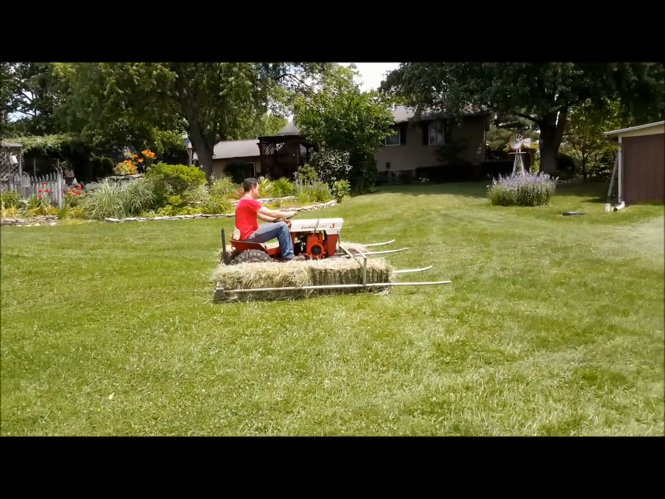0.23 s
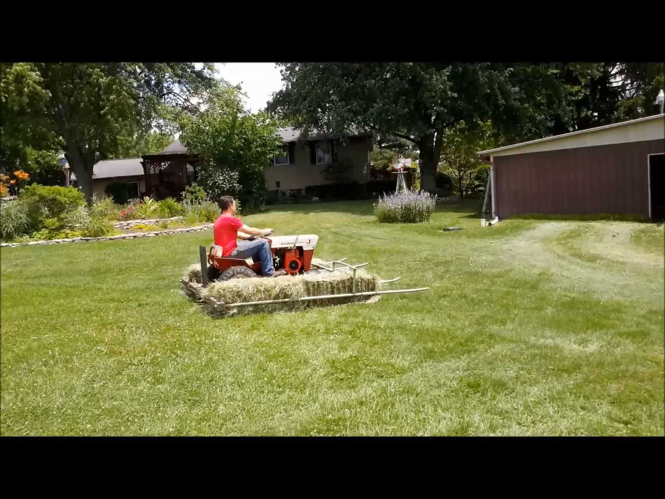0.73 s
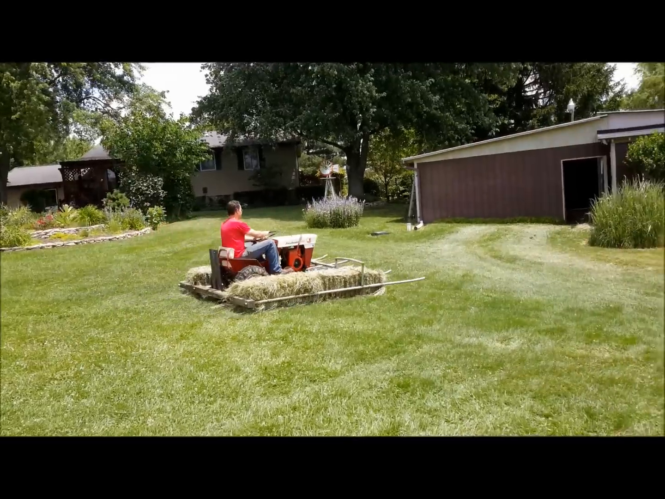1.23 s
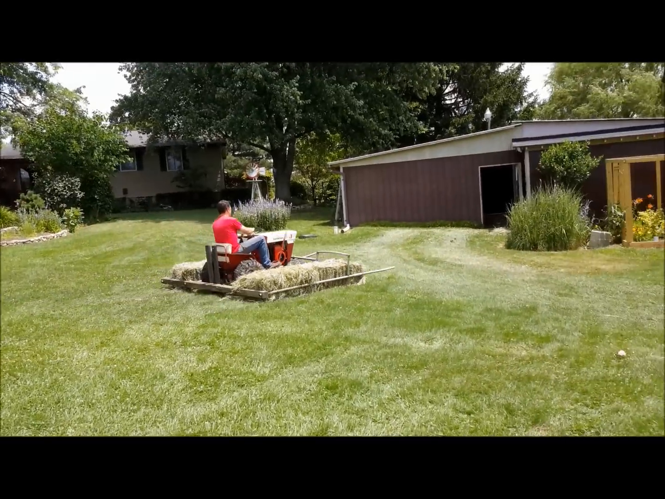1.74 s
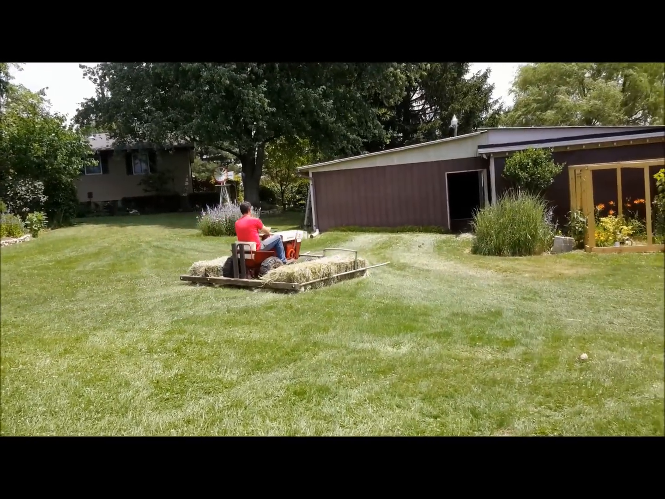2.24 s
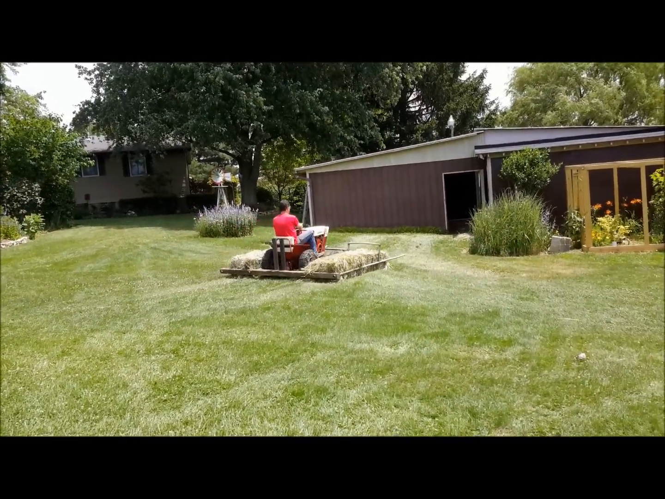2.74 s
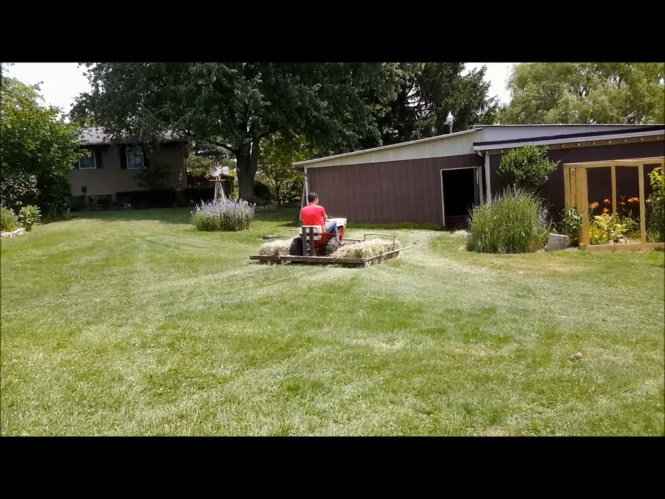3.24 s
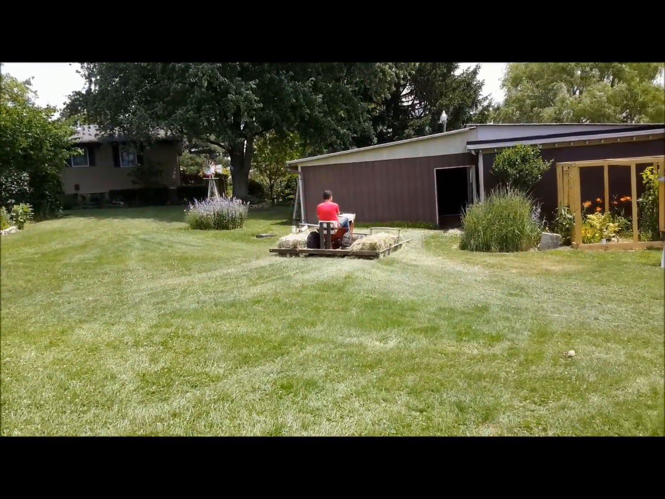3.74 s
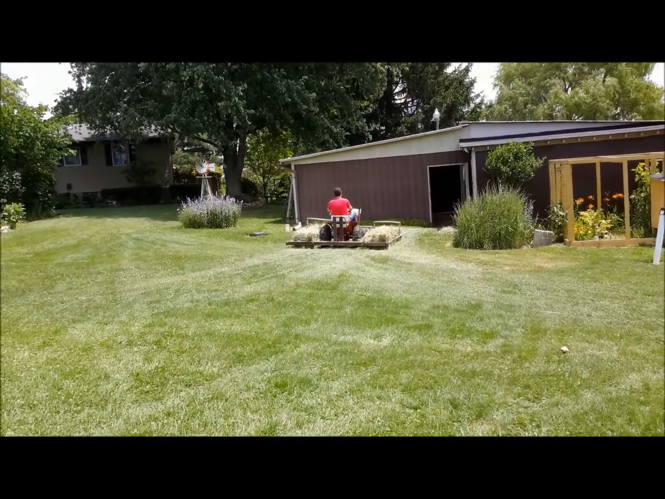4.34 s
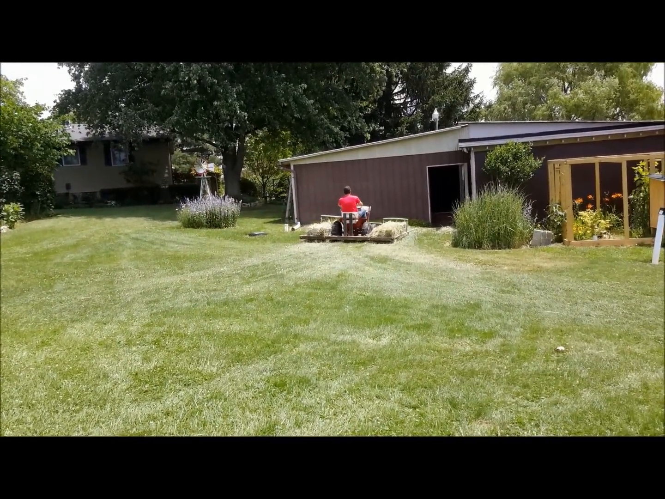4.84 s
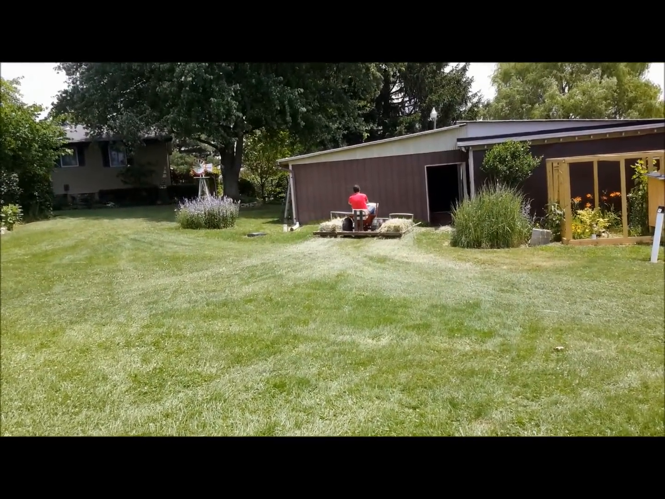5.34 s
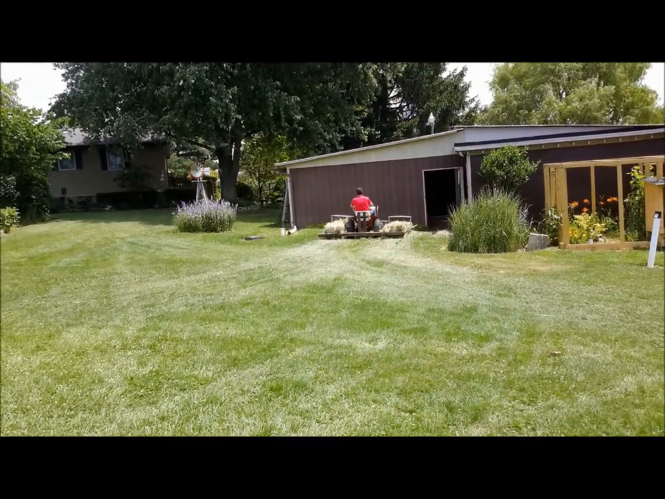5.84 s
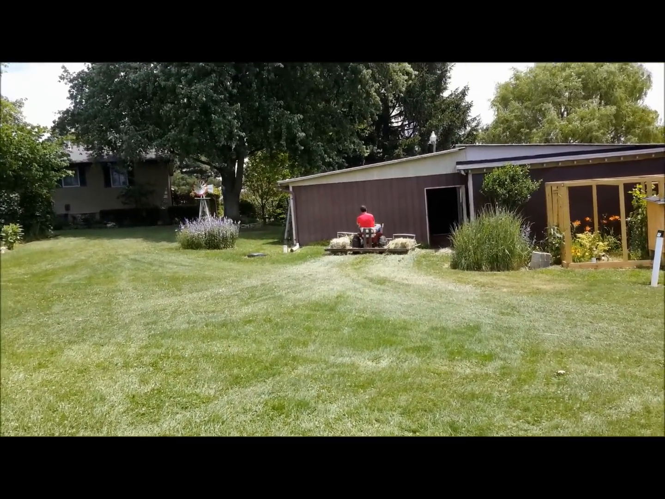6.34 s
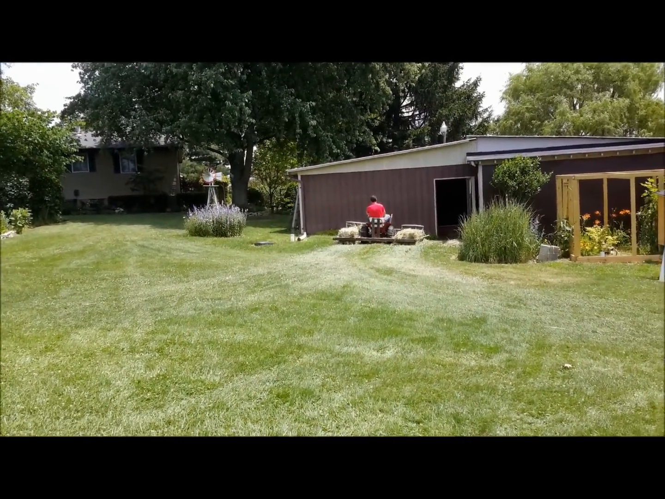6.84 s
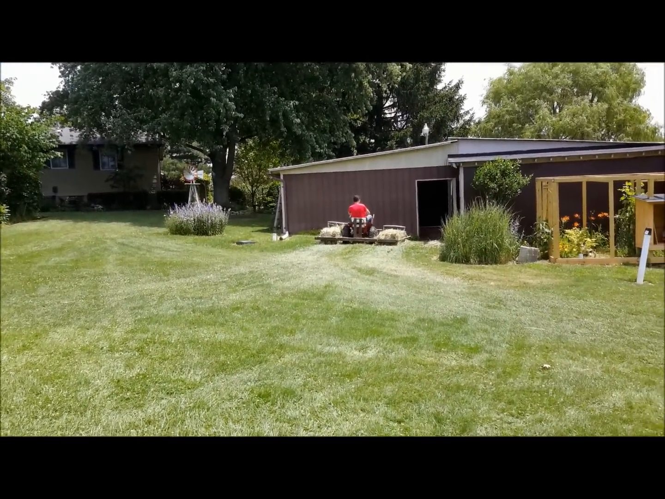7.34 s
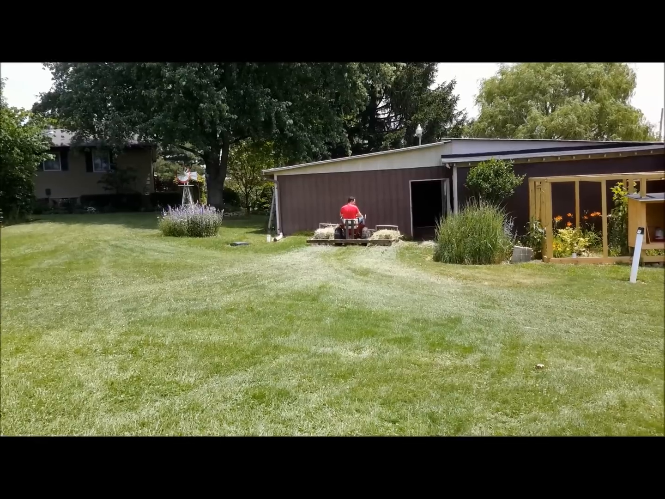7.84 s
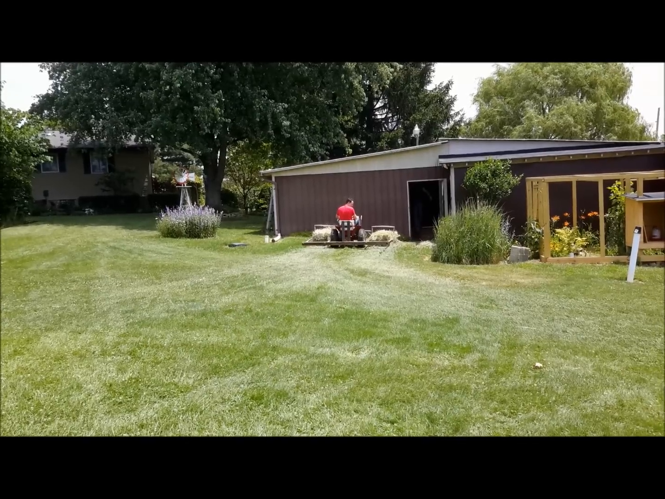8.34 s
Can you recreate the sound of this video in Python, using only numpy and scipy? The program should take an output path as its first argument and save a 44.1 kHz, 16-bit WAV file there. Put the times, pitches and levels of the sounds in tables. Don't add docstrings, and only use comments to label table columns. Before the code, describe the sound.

Outdoors on a lawn, a small single-cylinder tractor runs with quick, separate exhaust thumps and a loose tin clatter. It starts closest and rattly, then turns away, the clatter fading while the thumps stand out and echo off a shed. Near the end the engine slows, labours, then picks up slightly. Wind buffets the small microphone in low, blunt bumps, insects buzz very faintly, and a distant bird chirps late.

```python
import sys
import numpy as np
from scipy import signal
from scipy.fft import rfft, irfft, next_fast_len
from scipy.io import wavfile
from scipy.ndimage import uniform_filter1d, map_coordinates

SR = 44100
rng = np.random.default_rng(int(sys.argv[2]) if len(sys.argv) > 2 else 0)


def file_out(sig):
    cols = np.atleast_2d(sig).T
    lim = np.clip(cols, -1, 1)
    pcm = np.round(lim * 32767).astype(np.int16)
    wavfile.write(sys.argv[1], SR, pcm)


def magnitude_from_level(level_db):
    exponent = np.asarray(level_db, float) / 20
    return 10 ** exponent


N = 378813
t = np.arange(N) / SR


def unit(x):
    return x / np.sqrt(np.mean(x ** 2) + 1e-20)


def curves(rows):
    s, *columns = np.transpose(rows)
    return [np.interp(t, s, column) for column in columns]


def swells(rows):
    return sum(db * np.exp(-(2 * (t - s) / length) ** 2) for s, length, db in rows)


def wobble(knots_per_s):
    knots = rng.standard_normal(int(N * knots_per_s / SR) + 4)
    return map_coordinates(knots, [t * knots_per_s])


def filtered(x, response):
    size = next_fast_len(N + SR // 2)
    hz = np.fft.rfftfreq(size, 1 / SR)
    return irfft(rfft(x, size) * response(hz), size)[:N]


def coloured(x, spectrum):
    points_hz, db = np.transpose(spectrum)

    def response(hz):
        return magnitude_from_level(np.interp(np.log(hz + 1), np.log(points_hz), db, -120, -120))

    return unit(filtered(x, response))


def ringing(x, modes):
    def response(hz):
        total = 0
        for k, (centre_hz, width_hz, db) in enumerate(modes):
            damping = 1j * hz * width_hz
            total = total + (-1) ** k * magnitude_from_level(db) * damping / (centre_hz ** 2 - hz ** 2 + damping)
        return total

    return unit(filtered(x, response))


def cut(x, order, hz, kind):
    return signal.sosfilt(signal.butter(order, hz, kind, fs=SR, output="sos"), x)


def later(x, delay_ms):
    return np.interp(t - delay_ms / 1000, t, x, 0)


def smeared(x, t60, wet_db):
    tail = rng.standard_normal(SR // 4) * magnitude_from_level(-60 * t[:SR // 4] / t60)
    return x + magnitude_from_level(wet_db) * signal.fftconvolve(x, tail / np.linalg.norm(tail))[:N]


# start_s, firing_rate_hz
SPEED = [(0.0, 23.506), (0.5, 22.879), (1.8, 22.253), (3.2, 22.133), (3.5, 22.438), (5.0, 22.375),
         (5.5, 22.903), (6.4, 20.254), (7.25, 18.873), (7.45, 17.453), (7.7, 16.559), (7.87, 17.314),
         (8.02, 19.315), (8.6, 19.749)]


def firings(lead_ms, scatter_db):
    first_cycle = -.345
    cycle = np.floor(first_cycle + np.cumsum(curves(SPEED)[0]) / SR)
    at = np.nonzero(np.diff(cycle))[0] - round(lead_ms * SR / 1000)
    strength = magnitude_from_level(scatter_db * rng.standard_normal(len(at)))
    spikes = np.zeros(N)
    spikes[at[at >= 0]] = strength[at >= 0]
    return spikes


def swell(spikes, rise_ms, fall_ms):
    ms = 1000 * t[:SR // 10]
    pulse = (1 - np.exp(-ms / rise_ms)) * np.exp(-ms / fall_ms)
    return np.abs(signal.fftconvolve(spikes, pulse)[:N])


# start_s, delay_ms
SHED = [(0, 95), (2.1, 55.7), (2.6, 57.6), (3.7, 45), (4, 39), (5, 24.2), (6.3, 14.7), (7, 11.2),
        (7.8, 17.1), (8.6, 13.5)]
# start_s, rear_share_0_to_1, trailer_echo_db, house_echo_db
HOUSES = [
    (0, 0, -5, -12),
    (2, .1, -6, -12),
    (2.7, .15, -14, -7),
    (4.5, .25, -12, -7),
    (6.2, 1, -20, -18),
    (8.6, 1, -20, -18),
]
# centre_hz, width_hz, level_db
SILENCER = [(126, 32.3, 2), (199, 90, -2.5), (308, 25.4, -2.5), (560, 48, -24.5), (733, 32, -20)]
# centre_hz, width_hz, level_db
TAILPIPE = [(151, 54, -2), (241, 54, -2.5), (308, 144, -15.5), (680, 19, -47), (730, 18, -44)]


def thumps():
    delay_ms, = curves(SHED)
    shed_db = 3.5 - 0.37 * delay_ms
    rear, trailer_db, house_db = curves(HOUSES)
    blows = -cut(firings(lead_ms=4.9, scatter_db=1), order=2, hz=95, kind="high")
    back = ringing(blows, TAILPIPE)
    beat = (1 - rear) * ringing(blows, SILENCER) + rear * back
    trailer = magnitude_from_level(trailer_db) * later(beat, 8.4)
    house = magnitude_from_level(house_db) * later(back, 25.4)
    return unit(beat + trailer + house + magnitude_from_level(shed_db) * later(beat, delay_ms))


def gas(gate, modes):
    return cut(ringing(unit(gate) * rng.standard_normal(N), modes), order=8, hz=5690, kind="low")


# centre_hz, width_hz, level_db
OUTLET = [(1470, 770, -38), (2200, 47, -5), (2614, 99, -3.5), (4200, 1280, -3.5), (5300, 1360, -1.5)]
# centre_hz, width_hz, level_db
JET = [(2810, 58, -0.5), (4300, 410, -21), (5206, 750, 2.5)]
# centre_s, length_s, rise_db
SPITS = [(.55, 0.31, 5.5), (1.4, 1, 1), (3.32, 0.55, 7.5), (3.97, 0.093, 1), (4.25, 0.067, 6.5),
         (4.87, 0.28, 4.5), (5.3, .14, 4), (7.2, 0.58, 12), (7.7, 0.046, 3), (7.86, 0.2, 10),
         (8.5, 0.053, 5)]


def puffs(spits):
    delay_ms, = curves(SHED)
    direct = gas(swell(spits, rise_ms=2.0, fall_ms=3.5), OUTLET)
    front = gas(swell(spits, rise_ms=1.7, fall_ms=2.8), JET)
    puff = direct + magnitude_from_level(3) * later(front, delay_ms + 2.1)
    return magnitude_from_level(swells(SPITS)) * smeared(puff, t60=0.14, wet_db=-4)


# frequency_hz, density_db_per_hz
CLATTER = [(210, -54), (350, -18), (450, -13.5), (600, -1.5), (740, -2), (1000, -11.5), (1500, -6),
           (1820, -15.5), (2120, -6.5), (2450, -14), (2750, -7), (3100, -11), (4100, -6), (5360, -14),
           (6300, -21), (8850, -24.5), (14800, -33.5)]
# centre_hz, width_hz, level_db
BONNET = [(566, 69, -11.5), (606, 10.5, -3.5), (665, 8.4, -0.5), (741, 8.2, 4.5)]


def clatter(spits):
    shake = 1 + 0.16 * unit(swell(spits, rise_ms=3.0, fall_ms=3.4))
    unsteady = magnitude_from_level(1.2 * wobble(60) + 0.35 * wobble(13))
    rattle = coloured(shake * unsteady * rng.standard_normal(N), CLATTER)
    knocks = swell(firings(lead_ms=5.92, scatter_db=-1.5), rise_ms=0.23, fall_ms=0.24)
    knock_db = -9.5 - 6 * curves(HOUSES)[0]
    return rattle + magnitude_from_level(knock_db) * ringing(knocks, BONNET)


# start_s, clatter_db
ENGINE = [(0, -44.5), (0.35, -46.5), (0.75, -41.5), (1.5, -42), (2.17, -45), (2.27, -51.5), (2.7, -49.5),
          (2.95, -54), (3.3, -49), (3.95, -47), (4.6, -49), (5.1, -50), (5.5, -48.5), (5.75, -52.5),
          (7.3, -55), (7.66, -56), (7.7, -52), (8.59, -53)]
# start_s, thump_over_clatter_db, puff_over_clatter_db
FACING = [(0, 1.5, -13), (.45, 1.5, -14), (.8, 4, -8.5), (2.2, 6, -8.5), (3.6, 10.5, -4), (5.4, 9.5, -2),
          (5.8, 8.5, -15), (7.4, 11, -25), (7.66, 13, -18), (7.7, 7, -7.5), (8.59, 10, -10.5)]


def engine():
    clatter_db, = curves(ENGINE)
    thump_db, puff_db = clatter_db + curves(FACING)
    spits = firings(lead_ms=3.55, scatter_db=3)
    return magnitude_from_level(thump_db) * thumps() + magnitude_from_level(puff_db) * puffs(spits) + magnitude_from_level(clatter_db + 2.0) * clatter(spits)


# start_s, peak_db, pitch_hz
POPS = [(0.019, -10.5, 125), (0.969, -11, 122), (1.033, -16, 128), (1.134, -23, 131), (1.165, -27, 170),
        (1.759, -11.5, 176), (1.781, -13, 170), (1.812, -10.5, 170), (2.099, -11.5, 199),
        (2.193, -5.5, 297), (2.26, -9, 122), (2.334, -29, 151), (2.372, -24, 200), (2.432, -13.5, 181),
        (2.549, -16, 280), (3.613, -7.5, 201), (5.014, -10, 254), (5.048, -11, 132), (5.089, -17, 238),
        (5.104, -8, 153), (5.174, -35, 130), (5.219, -13, 161), (5.451, -17, 175), (5.881, -13.5, 184),
        (5.922, -9, 118), (6.662, -9.5, 308), (6.689, -18, 232), (6.716, -21, 144), (7.64, -7.5, 127),
        (7.668, -21, 142)]


def pops():
    push = np.zeros(N + SR)
    for s, db, hz in POPS:
        cycles = t[:round(2.2 * SR / hz)] * hz
        shape = np.hanning(len(cycles)) * np.cos(2 * np.pi * cycles)
        push[round(s * SR):][:len(cycles)] -= magnitude_from_level(db - 7.5) * shape
    return push[:N]


# start_s, hold_s, buffet_db, edge_over_buffet_db
GUSTS = [(.03, 0.0078, -33, -4.5), (0.093, 0.015, -30.5, -7), (0.952, 0.09, -34, -2.5),
         (1.127, .22, -33, -4.5), (1.394, 0.26, -35, -17), (1.767, 0.017, -24.5, -7.5),
         (2, 0.063, -35.5, -26), (2.076, 0.13, -33, -1.5), (2.246, 0.031, -23.5, -11.5),
         (2.326, 0.055, -31, 4), (2.447, 0.12, -36, -11.5), (3.203, 0.009, -35.5, -13),
         (3.297, 1.9, -40.5, -13.5), (3.44, 0.079, -38.5, -15), (3.953, 0.022, -47, -14),
         (4.09, 0.015, -34.5, -9), (4.328, 0.11, -40, -10.5), (4.576, 0.018, -33.5, -5.5),
         (4.69, .14, -36.5, -12), (5.006, .1, -34, -1), (5.155, 0.081, -31, -10.5), (5.341, 0.15, -33, -16),
         (5.55, 0.25, -41.5, -21), (5.796, 0.027, -29.5, -5.5), (5.878, 0.13, -36.5, -7),
         (6.022, 0.15, -31, -12), (6.286, 0.55, -43, -24), (6.66, 0.054, -36, -18),
         (6.96, 0.012, -37.5, -24), (7.663, 0.023, -37.5, -11.5)]


def gusts():
    rise_db_per_s, fall_db_per_s = 478, 385
    buffet_db, edge_db = np.full(N, -46.0), np.full(N, -17.0)
    for s, hold, db, sharp_db in GUSTS:
        before_s, after_s = np.maximum(s - t, 0), np.maximum(t - s - hold, 0)
        own_db = db - rise_db_per_s * before_s - fall_db_per_s * after_s
        edge_db = np.where(own_db > buffet_db, sharp_db, edge_db)
        buffet_db = np.maximum(buffet_db, own_db)
    return buffet_db, uniform_filter1d(edge_db, size=SR // 40)


# frequency_hz, density_db_per_hz
BUFFET = [(15, -79), (30, -30), (68, -6), (124, -1.5), (250, -6), (340, -13.5), (600, -54)]
# frequency_hz, density_db_per_hz
EDGE = [(150, -19), (300, 5.5), (430, -0.5), (600, -9), (900, -21.5), (1400, -31)]
# frequency_hz, density_db_per_hz
BREEZE = [(15, -37), (30, -4), (55, -14), (80, -13), (110, 26), (160, -40)]


def wind():
    buffet_db, edge_db = gusts()
    buffet_db = buffet_db + .6 * np.minimum(buffet_db + 40, 0)
    eddies = wobble(40)
    body = unit(magnitude_from_level(1.0 * eddies) * coloured(rng.standard_normal(N), BUFFET))
    edge = unit(magnitude_from_level(2 * eddies + 3.5 * wobble(110)) * coloured(rng.standard_normal(N), EDGE))
    breeze = magnitude_from_level(-50 + 0.56 * wobble(5.7)) * coloured(rng.standard_normal(N), BREEZE)
    return magnitude_from_level(buffet_db) * (body + magnitude_from_level(edge_db) * edge) + breeze


# centre_s, length_s, rise_db
INSECTS = [(.85, 0.12, 10), (1.43, 0.58, 8), (2.13, 0.68, 6), (2.82, 0.1, 7.5), (3.06, 0.067, 7),
           (3.71, 0.87, 10), (4.3, 0.39, 9), (4.62, 0.27, 7.5), (5.15, 0.79, 7.5), (5.65, 0.77, 5),
           (6.1, 0.36, 0), (6.47, 0.065, 3), (7.85, .35, 8.5)]
# frequency_hz, density_db_per_hz
BUZZ = [(8000, -50), (10400, -0.5), (11300, -7.5), (12200, 0.5), (13600, -2), (14300, -38)]


def insects():
    level_db = -70 - 6.5 * (t > 6.55) + swells(INSECTS)
    return magnitude_from_level(level_db + 2.8 * wobble(8)) * coloured(rng.standard_normal(N), BUZZ)


# start_s, length_s, start_pitch_hz, end_pitch_hz, level_db
BIRD = [(5.984, 0.056, 4140, 3830, -51), (5.998, 0.043, 4680, 4460, -46), (6.067, 0.044, 4050, 4430, -48),
        (6.3, 0.038, 5300, 5230, -60), (7.03, 0.042, 4300, 4670, -46.5), (7.066, 0.013, 4720, 3770, -42),
        (7.133, 0.027, 3920, 3730, -45), (7.427, 0.021, 6040, 5850, -53.5), (7.44, 0.025, 5300, 5240, -54),
        (7.528, .035, 5060, 4620, -53), (8.049, 0.04, 4500, 4750, -48), (8.135, 0.022, 3980, 3740, -49)]


def bird():
    song = np.zeros(N + SR)
    for s, length, start_hz, end_hz, db in BIRD:
        size = round(length * SR)
        hz = np.linspace(start_hz, end_hz, size)
        whistle = np.hanning(size) ** 0.5 * np.sin(2 * np.pi * np.cumsum(hz) / SR)
        song[round(s * SR):][:size] += magnitude_from_level(db - 3) * whistle
    return smeared(song[:N] * magnitude_from_level(3.5 * wobble(220)), t60=.2, wet_db=2)


def scene():
    return (engine() + wind() + pops() + bird() + insects())[None]


# frequency_hz, level_db
STEP = [(5500, -115), (7000, -93), (8300, -86.5), (9600, -83.5), (11500, -82), (14000, -81)]
WHOLE = [2.45, 3.18, 3.22, 3.26, 3.355, 3.4, 3.44, 3.75, 3.97, 4.81, 4.94, 5.03, 5.335]


def starved(x):
    window = np.sin(np.pi * (np.arange(2048) + .5) / 2048)
    hz, s, z = signal.stft(x, SR, window, nperseg=2048)
    midrange = np.abs(z[0, (hz > 3000) & (hz < 7000)]).mean(axis=0)
    midrange_level = uniform_filter1d(midrange, size=13)
    chance_db = 2.5 * np.repeat(rng.standard_normal((65, len(s))), 16, axis=0)[:len(hz)]
    step_db = np.interp(hz, *np.transpose(STEP))[:, None] + chance_db
    step = magnitude_from_level(step_db) * (midrange_level / np.median(midrange_level)) ** .75
    whole = np.abs(s[:, None] - WHOLE).min(axis=1) < .012
    lifted = z * magnitude_from_level(1.1 * (hz > 8500))[:, None]
    z = np.where(whole, lifted, z * (np.abs(z) > step))
    return signal.istft(z, SR, window, nperseg=2048)[1][:, :N]


def roll_off(x):
    return signal.sosfilt(signal.butter(12, 14990, fs=SR, output="sos"), x)


def record(dry):
    rounded = dry / (1 + np.abs(dry / .15) ** 4) ** (1 / 4)
    mix = starved(rounded)
    return roll_off(mix)


dry = scene()
out = record(dry)
file_out(out)
```